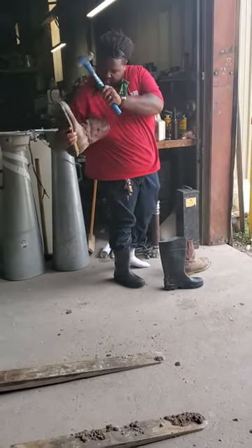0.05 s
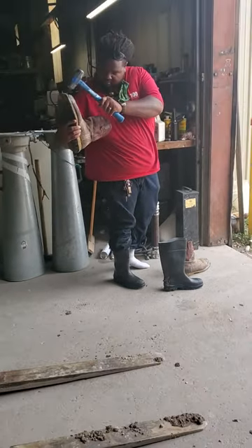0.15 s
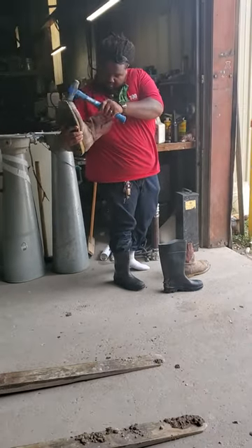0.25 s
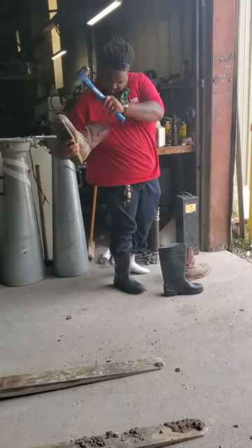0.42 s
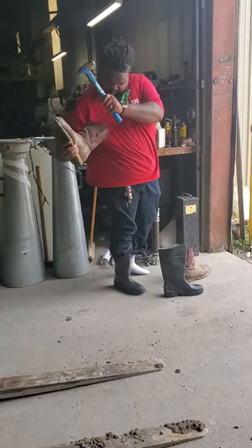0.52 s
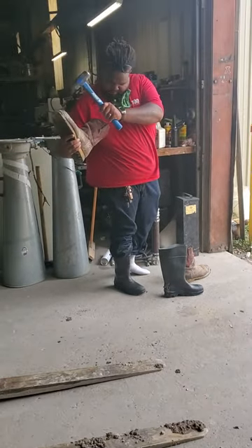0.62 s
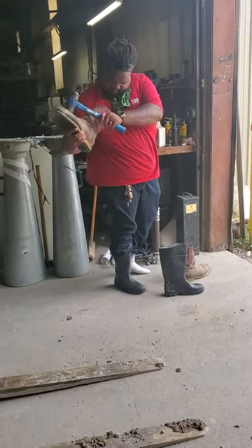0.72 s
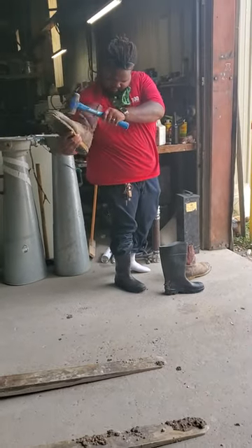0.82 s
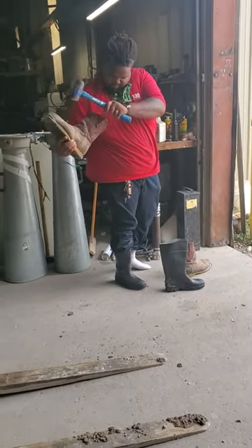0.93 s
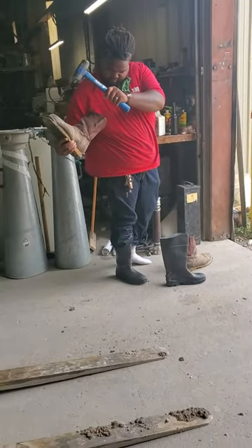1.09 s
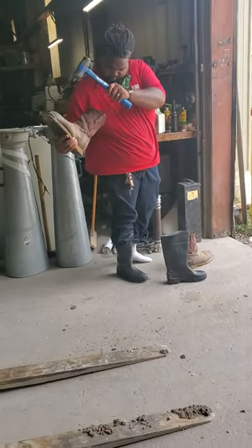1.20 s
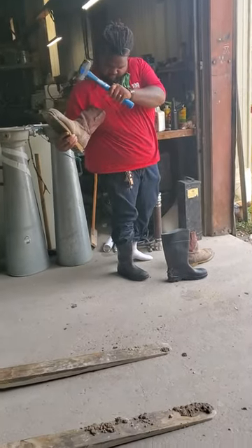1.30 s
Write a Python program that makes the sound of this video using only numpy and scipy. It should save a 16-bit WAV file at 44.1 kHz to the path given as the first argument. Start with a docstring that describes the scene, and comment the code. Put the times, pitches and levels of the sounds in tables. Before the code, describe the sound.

A hammer hits the sole of a leather boot twice. After a faint cloth rustle, the first blow lands at about 0.2 seconds with a leathery slap and dull thud, ringing briefly in the workshop. A lighter blow follows at 0.7 seconds. Soft hiss and a distant machine's low hum run throughout, and a breeze rumbles on the left microphone, mostly in the first half second.

```python
"""The doorway of a workshop, on a stereo pair. Hiss and the low hum of a distant machine run throughout,
and from the start a breeze buffets the left microphone. Cloth rustles faintly as an arm swings; at 0.2 s
a hammer strikes the sole of a hand-held leather boot. The soft contact gives a leathery slap and a thud
of heavily damped modes, thrown back by the floor and nearby surfaces; then the shop rings briefly.
At 0.7 s a second blow lands, its thud lighter."""
import sys
import numpy as np
from scipy import signal
from scipy.fft import rfft, irfft
from scipy.io import wavfile

SR = 44100
rng = np.random.default_rng(int(sys.argv[2]) if len(sys.argv) > 2 else 0)


def to_wav(s):
    """Save 16-bit WAV."""
    ch = np.atleast_2d(s).T  # columns
    pcm = np.round(np.clip(ch, -1, 1) * 32767)  # PCM
    wavfile.write(sys.argv[1], SR, pcm.astype(np.int16))


N = 59535
T = np.arange(N) / SR

# Room tone at each microphone. Each row: frequency in Hz, relative density in dB.
AIR_LEFT = [(25, -10.5), (60, 3), (110, -4.5), (150, -7), (280, -8.5), (420, -10.5), (700, -11),
            (1600, -13.5), (3300, -18), (4800, -23.5), (6900, -26), (7800, -37), (9200, -34),
            (10500, -36.5), (15500, -34.5)]
AIR_RIGHT = [(25, -37), (60, 2), (100, -6), (150, -9.5), (280, -10.5), (420, -10), (620, -5.5), (880, -8.5),
             (1100, -13), (3300, -17.5), (4800, -24), (6900, -29), (7900, -37.5), (9200, -29.5),
             (10200, -33), (13000, -23), (15500, -29.5)]
# How alike the microphones hear noise. Each row: frequency in Hz, left-right correlation.
CORRELATION = [(40, 0.79), (120, 0.87), (280, 0.97), (550, 0.46), (1000, -0.2), (2500, 0.039),
               (15000, -0.097)]
# The distant machine. Each row: frequency in Hz, nominal rms level in dB.
HUM_TONES = [(111.5, -47), (333, -54.5), (392, -56.5), (499, -56), (608, -57), (824, -57.5)]
# The background sinks slightly. Each row: time in seconds, gain in dB.
BACKGROUND_GAIN = [(0, 1), (0.15, 1), (0.5, -0.5), (1.35, -0.57)]
# Wind on the microphone. Each row: frequency in Hz, relative density in dB.
BUFFET_SPECTRUM = [(20, -34), (45, -17), (75, 3.5), (130, -9.5), (250, -20.5), (1000, -70), (4000, -80)]
# Its gusts. Each row: time in seconds, level in dB.
GUSTS = [(0, -35), (0.09, -37), (0.13, -27), (0.2, -36), (0.3, -30), (0.42, -41), (0.55, -50), (0.78, -48),
         (0.825, -36), (0.93, -46), (1.35, -56)]
# Hammer blows. Each row: start in seconds, force in dB, contact low-pass in Hz, slap in dB,
# crack pitch in Hz, crack in dB, send into the shop in dB, smack pitch in Hz.
BLOWS = [(0.2024, 0.75, 650, -16.5, 1725, -25, -1, 1310), (0.704, -7.5, 1780, -16.5, 2530, -30.5, 2, 950)]
# Modes of sole and shaft. Each row: frequency in Hz, gain in dB, width in Hz.
BOOT_MODES = [(284, 31, 50), (443, 41.7, 399), (660, 54.2, 95), (979, 27.3, 149), (1201, 23.2, 100)]
# Paths from boot to microphones. Each row: delay in seconds, gain in dB, left over right in dB,
# left lead in seconds, centre and width of the band passed in Hz.
PATHS = [(0.00109, 1.3, 1.7, 0.00023, 584, 150), (0.00185, 3, 8.9, -0.00004, 1176, 493),
         (0.00208, 0.2, 0.5, 0, 637, 397), (0.00405, 1.4, -1.7, 0.00038, 1251, 220),
         (0.01057, -14.2, -1.8, 0.00075, 725, 2620), (0.01097, -9.3, -7.5, -0.00032, 817, 150),
         (0.01722, -10, -19, -0.00033, 840, 150)]
# Steel slapping the sole. Each row: frequency in Hz, relative density in dB.
SLAP_SPECTRUM = [(100, -8), (210, 0.5), (330, 12.5), (500, -7), (850, -10.5), (1100, -9), (1400, -4),
                 (1650, -15.5), (2100, -21.5), (3000, -27), (5000, -29), (8000, -37), (14000, -30.5)]
# The slap off nearby surfaces. Each row: delay in seconds, gain in dB, left over right in dB.
SLAP_ECHOES = [(0.0095, -4.5, 4), (0.0186, -9.5, -7.5)]
# The shop's reverberation. Each row: frequency in Hz, relative density in dB.
SHOP_SPECTRUM = [(100, -12), (200, -5.5), (280, -9), (480, -10.5), (680, -1), (950, -3.5), (1250, -12.5),
                 (1800, -14.5), (2600, -14.5), (4000, -15), (10000, -43)]
# Its decay by band. Each row: frequency in Hz (half the band's upper edge), T60 in seconds.
SHOP_DECAY = [(150, 0.19), (600, 0.66), (1500, 0.5), (6000, 0.18)]
# Its standing waves. Each row: frequency in Hz, gain in dB, T60 in seconds.
SHOP_MODES = [(278.2, -20.5, 0.31), (423.4, -32, 0.78), (616, -33, 0.8), (654, -18, 0.25), (780, -54, 0.15),
              (941, -28, 0.35)]


def from_db(db):
    """Decibels to gain."""
    return 10 ** (np.asarray(db) / 20)


def unit_rms(x):
    """Scale to rms 1."""
    return x / np.sqrt(np.mean(x ** 2) + 1e-20)


def at_hz(points, hz):
    """Read a spectrum on a log-frequency axis."""
    f, value = np.transpose(points)
    return np.interp(np.log(np.maximum(hz, 1)), np.log(f), value)


def panned(db):
    """Left and right gains for a level difference."""
    return from_db(np.array([[db], [-db]]) / 2)


def delayed(x, s):
    """A sound started s seconds later."""
    return np.interp(T - s, T, x, left=0)


def resonance(x, hz, width_hz):
    """Two-pole band-pass, gain 1 on top."""
    return signal.lfilter(*signal.iirpeak(hz, hz / width_hz, fs=SR), x + 1e-18)


def noise(*spectra):
    """Stereo noise, alike in the bass, from one spectrum or one per microphone; rms 1."""
    hz = np.arange(N // 2 + 1) * SR / N
    mid, side = rfft(rng.standard_normal((2, N)))
    alike = at_hz(CORRELATION, hz)
    pair = np.sqrt(1 + alike) * mid + np.sqrt(1 - alike) * side * [[1], [-1]]
    colour = from_db([at_hz(spectrum, hz) for spectrum in spectra])
    return unit_rms(irfft(pair * colour, N))


def ringing_noise(hz, width_hz):
    """Stereo noise through a resonance applied twice; rms 1."""
    band = resonance(rng.standard_normal((2, N)), hz, width_hz)
    return unit_rms(resonance(band, hz, width_hz))


def drift(per_s):
    """Slow random wander of spread about 1."""
    return np.interp(T * per_s, np.arange(64), rng.standard_normal(64))


def background(air_db=-37, wander_hz=2.56, waver_db=4.5):
    """Steady hiss and rumble with the wavering hum of a distant machine."""
    air = noise(AIR_LEFT, AIR_RIGHT) * from_db(air_db)
    hum = 0
    for hz, db in HUM_TONES:
        turns = np.cumsum(hz + wander_hz * drift(10.16)) / SR + rng.random()
        hum += np.sqrt(2) * np.sin(2 * np.pi * turns) * from_db(db + waver_db * drift(10.11))
    return (air + hum) * from_db(np.interp(T, *np.transpose(BACKGROUND_GAIN)))


def breeze():
    """Gusts buffet the left microphone with a low rumble."""
    gusts = from_db(np.interp(T, *np.transpose(GUSTS)))
    return noise(BUFFET_SPECTRUM) * gusts * [[1], [0]]


def rustle(peak_s=0.13, spread_s=0.057, db=-45.5):
    """A soft swell of cloth as the arm swings for the first blow."""
    cloth = unit_rms(resonance(rng.standard_normal((2, N)), hz=2480, width_hz=250))
    return cloth * from_db(db) * np.exp(-((T - peak_s) / spread_s) ** 2)


def contact(start, db, soft_hz):
    """The rounded force pulse of the hammer sinking into the sole."""
    rate = 2 * np.pi * soft_hz
    age = np.maximum(T - start, 0)
    return from_db(db) * rate ** 2 / SR * age * np.exp(-rate * age)


def slap(attack_s=0.00059, burst_t60=0.055, crack_t60=0.046, smack_t60=0.083, smack_db=-21):
    """Rubber and leather crush in a rough burst, with a crack and a smack pitched by the spot struck."""
    out = 0
    for start, _, _, slap_db, crack_hz, crack_db, _, smack_hz in BLOWS:
        age = np.maximum(T - start, 0)
        crack = ringing_noise(crack_hz, width_hz=350) * from_db(crack_db - 60 * age / crack_t60)
        # The smack is the patch of sole flexing under the hammer.
        smack = ringing_noise(smack_hz, width_hz=250) * from_db(smack_db - 60 * age / smack_t60)
        burst = noise(SLAP_SPECTRUM) * from_db(slap_db - 60 * age / burst_t60)
        out += (burst + smack + crack) * (1 - np.exp(-age / attack_s))
    return out * panned(db=3)


def thud(force):
    """The boot's damped modes reach the microphones straight and off nearby surfaces."""
    boot = out = 0
    for polarity, (hz, db, width_hz) in zip((-1, 1, -1, 1, 1), BOOT_MODES):
        boot += polarity * from_db(db) * resonance(force, hz, width_hz)
    for delay, db, pan_db, lead, hz, width_hz in PATHS:
        arrival = from_db(db) * resonance(boot, hz, width_hz)
        out += panned(pan_db) * [delayed(arrival, delay - lead / 2), delayed(arrival, delay + lead / 2)]
    return out


def with_echoes(direct):
    """A sound followed by its first reflections off nearby surfaces."""
    echoes = 0
    for delay, db, pan_db in SLAP_ECHOES:
        echoes += from_db(db) * panned(pan_db) * [delayed(side, delay) for side in direct]
    return direct + echoes


def shop(force, diffuse_db=-15.5, build_s=0.0046, delay_s=0.019):
    """The farther walls answer last: a diffuse ring, longest in the mids, and a few standing waves."""
    rest, response = noise(SHOP_SPECTRUM), 0
    for hz, t60 in SHOP_DECAY:
        band = signal.sosfiltfilt(signal.butter(2, 2 * hz, fs=SR, output="sos"), rest)
        rest = rest - band
        response += band * from_db(diffuse_db - 60 * T / t60)
    for hz, db, t60 in SHOP_MODES:
        response += np.sin(2 * np.pi * (hz * T + rng.random())) * from_db(db - 60 * T / t60)
    response *= 1 - np.exp(-(T / build_s) ** 2)
    return signal.fftconvolve(response, delayed(force, delay_s)[None], axes=1)[:, :N]


def scene():
    """Two blows in the doorway, over room tone and breeze."""
    force = into_shop = 0
    for start, db, soft_hz, _, _, _, send_db, _ in BLOWS:
        force += contact(start, db, soft_hz)
        into_shop += contact(start, db + send_db, soft_hz)
    return background() + breeze() + rustle() + with_echoes(slap()) + thud(force) + shop(into_shop)


def record(dry):
    """The highest peaks are rounded off and the top is cut at 15.8 kHz."""
    rounded = dry / (1 + dry ** 8) ** (1 / 8)
    return signal.sosfilt(signal.ellip(12, .1, 90, 15800, fs=SR, output="sos"), rounded)


dry = scene()
out = record(dry)
to_wav(out)
```